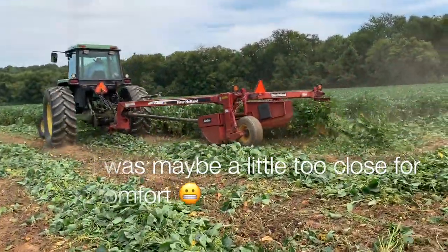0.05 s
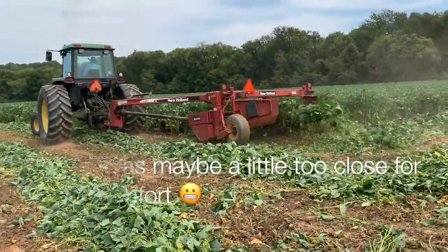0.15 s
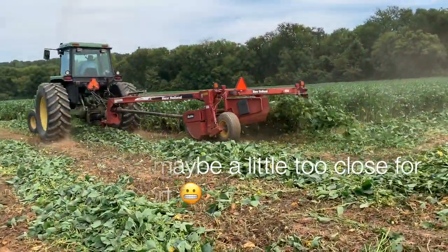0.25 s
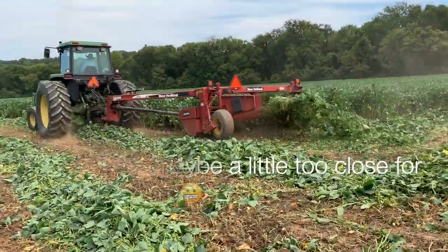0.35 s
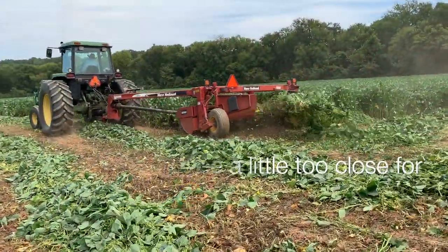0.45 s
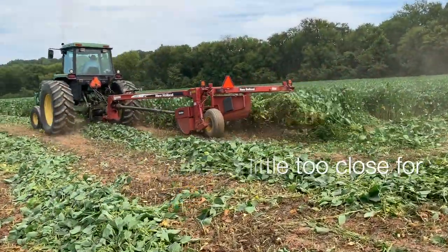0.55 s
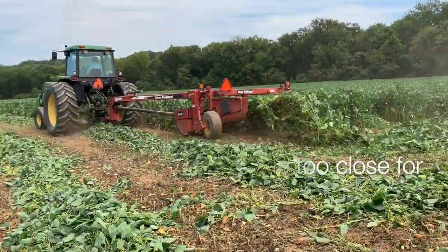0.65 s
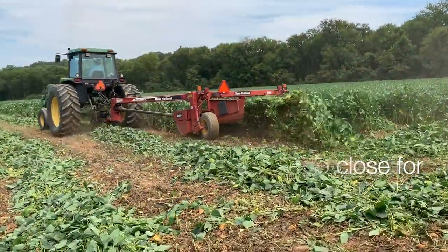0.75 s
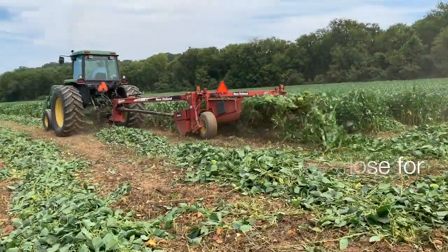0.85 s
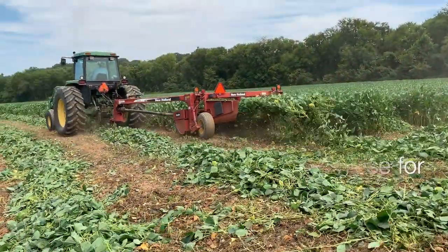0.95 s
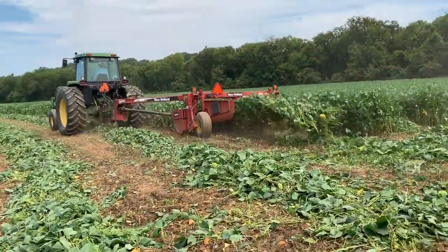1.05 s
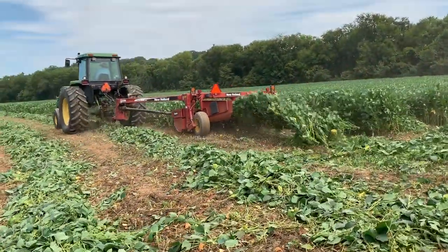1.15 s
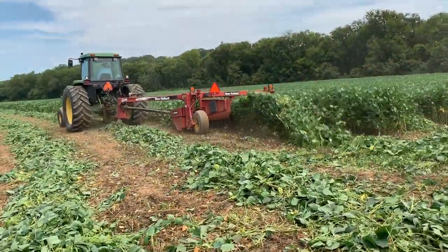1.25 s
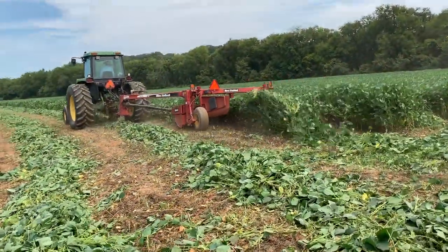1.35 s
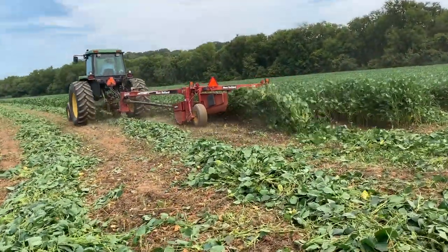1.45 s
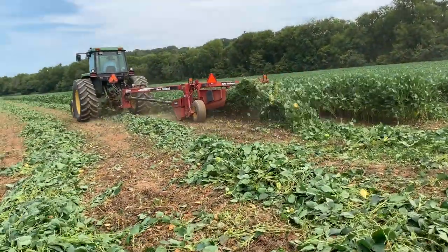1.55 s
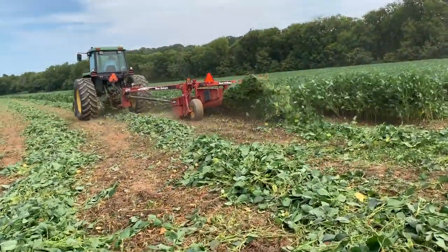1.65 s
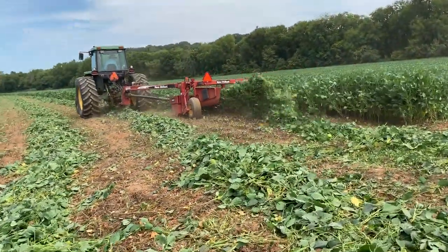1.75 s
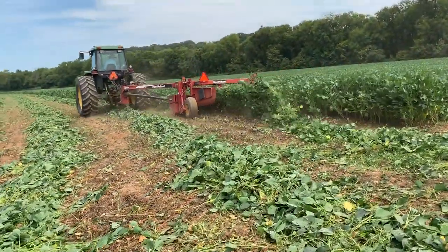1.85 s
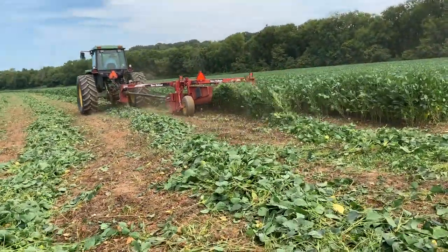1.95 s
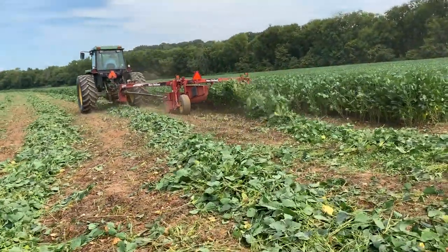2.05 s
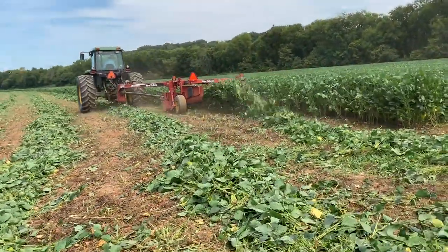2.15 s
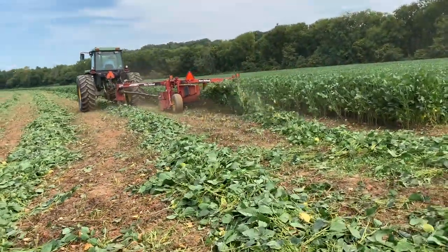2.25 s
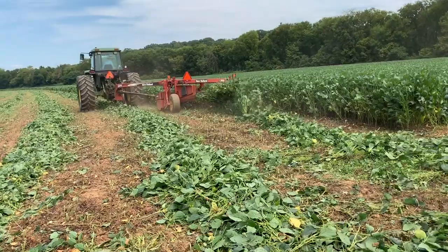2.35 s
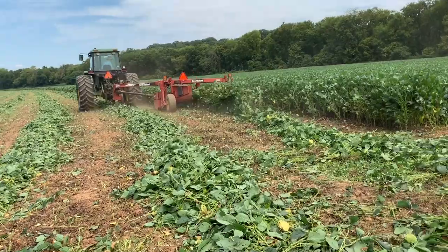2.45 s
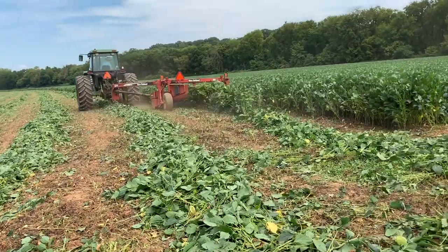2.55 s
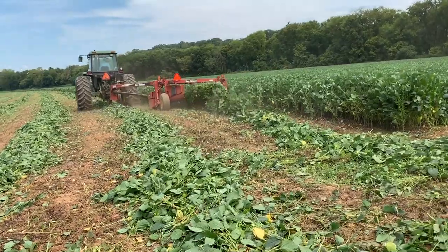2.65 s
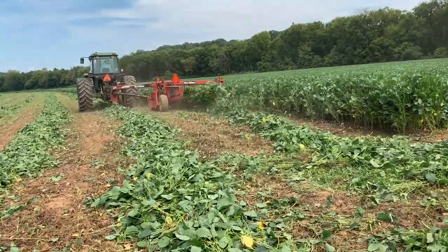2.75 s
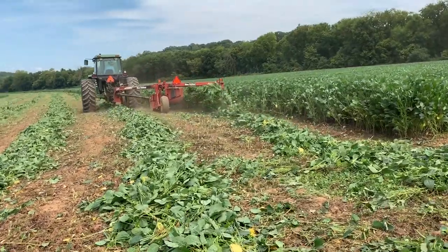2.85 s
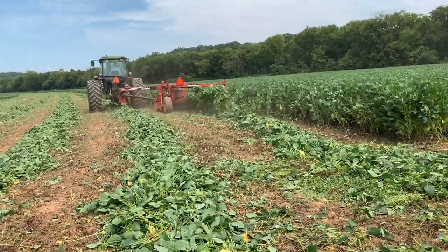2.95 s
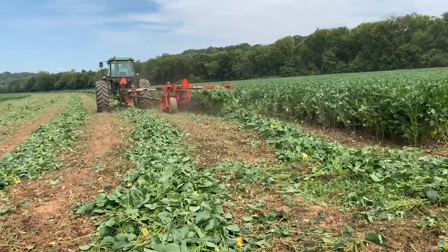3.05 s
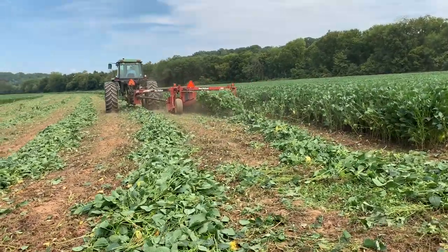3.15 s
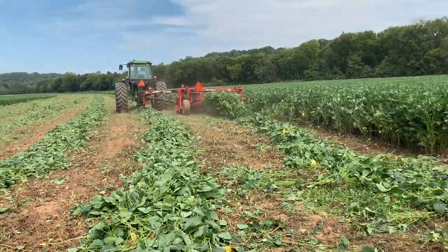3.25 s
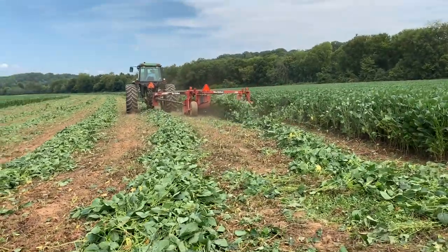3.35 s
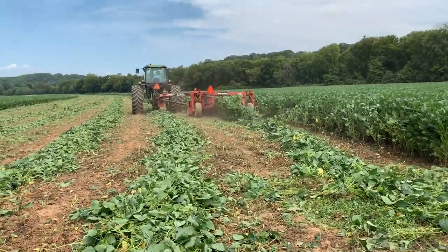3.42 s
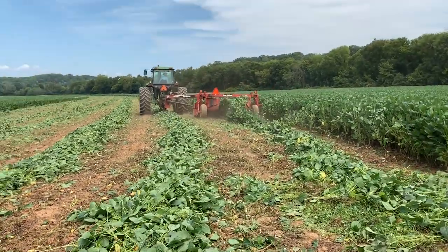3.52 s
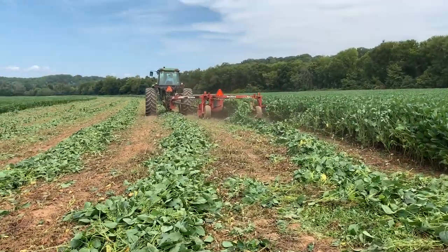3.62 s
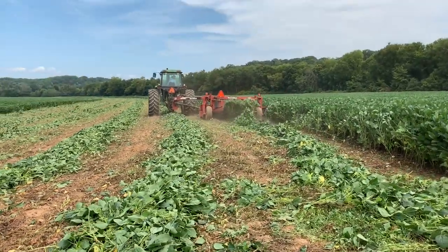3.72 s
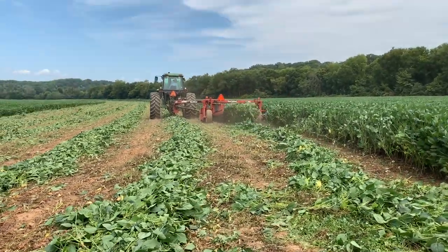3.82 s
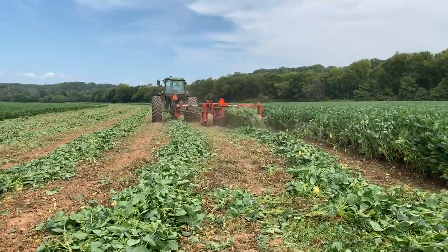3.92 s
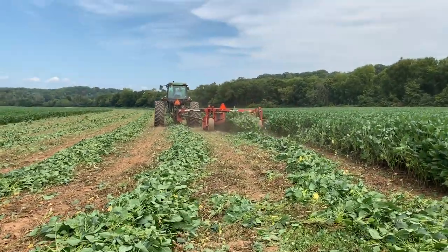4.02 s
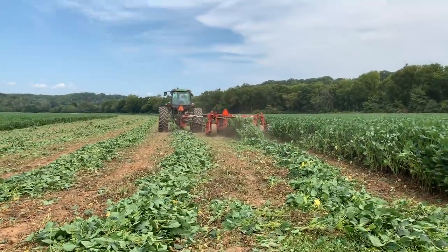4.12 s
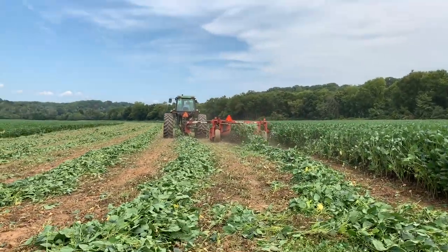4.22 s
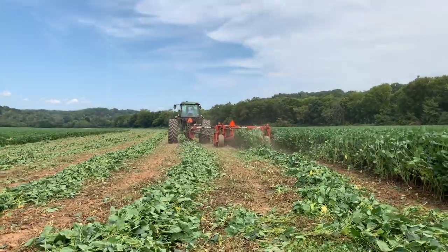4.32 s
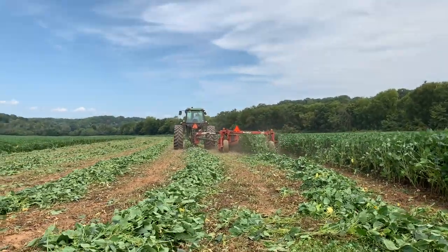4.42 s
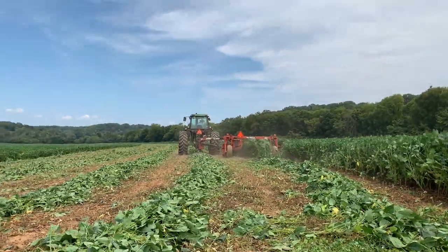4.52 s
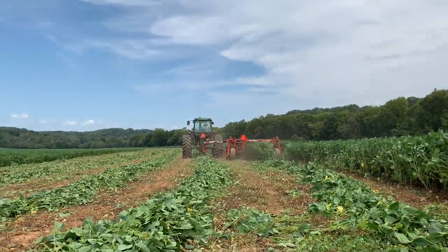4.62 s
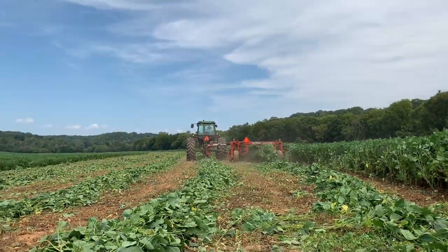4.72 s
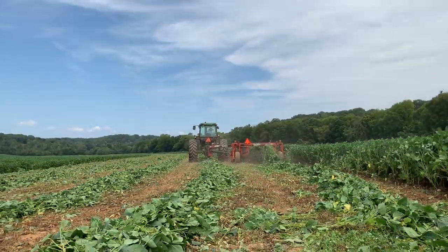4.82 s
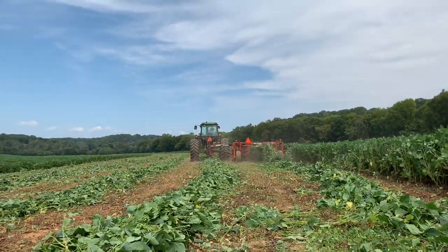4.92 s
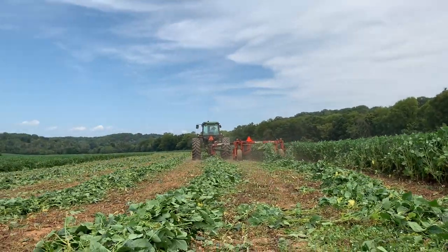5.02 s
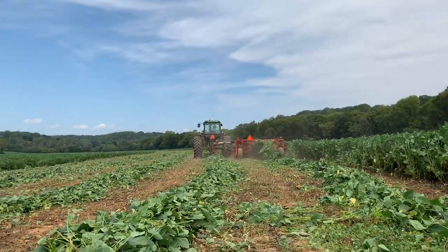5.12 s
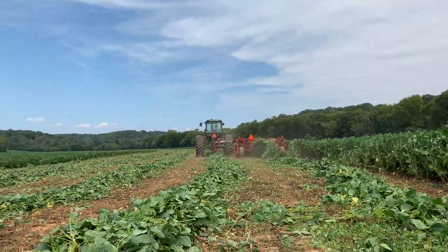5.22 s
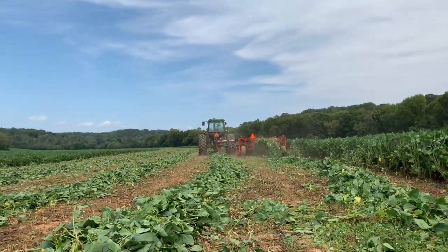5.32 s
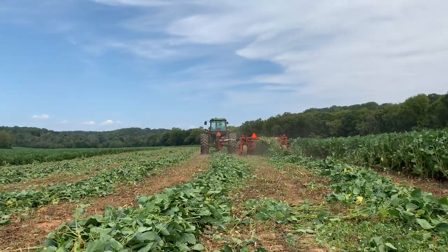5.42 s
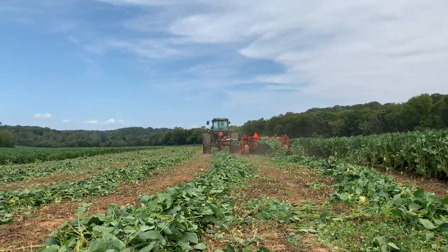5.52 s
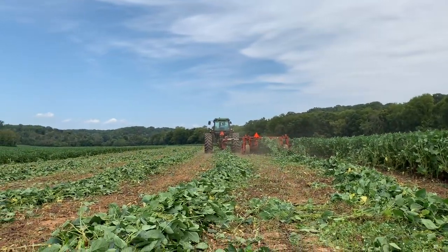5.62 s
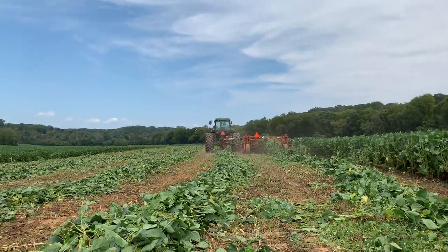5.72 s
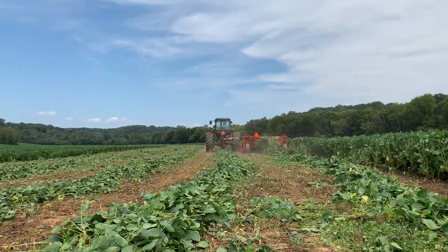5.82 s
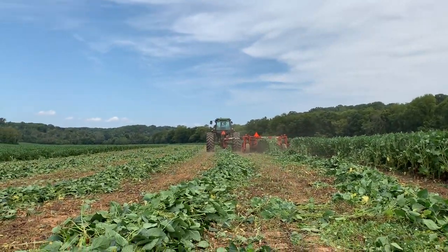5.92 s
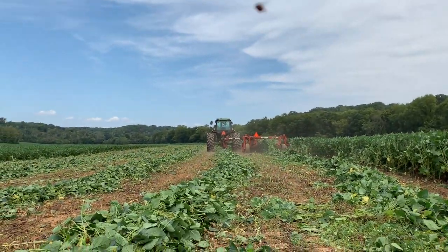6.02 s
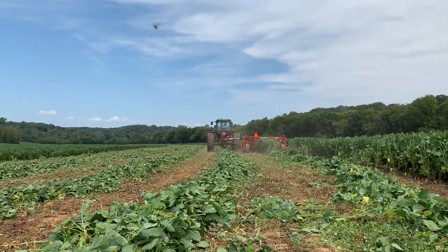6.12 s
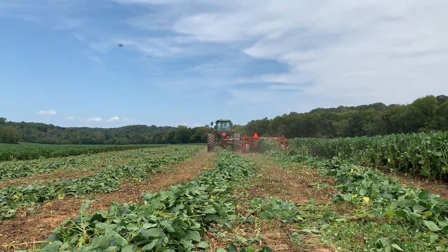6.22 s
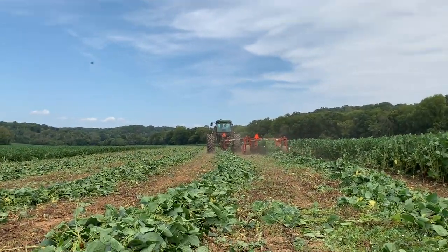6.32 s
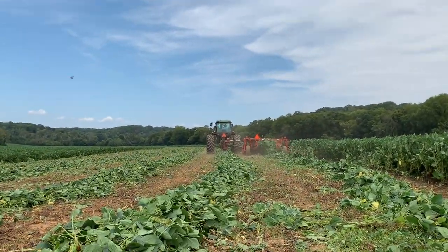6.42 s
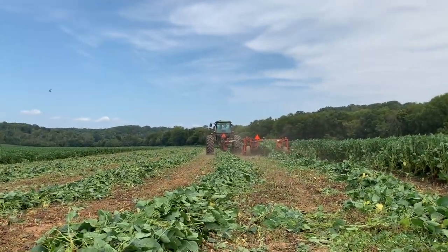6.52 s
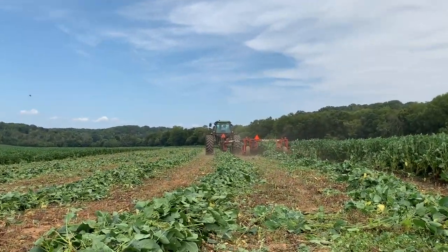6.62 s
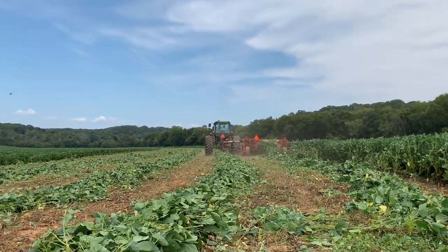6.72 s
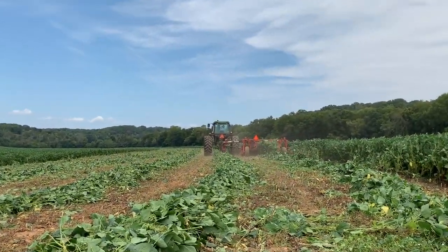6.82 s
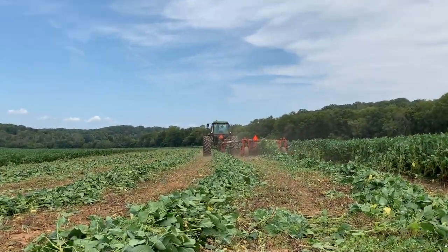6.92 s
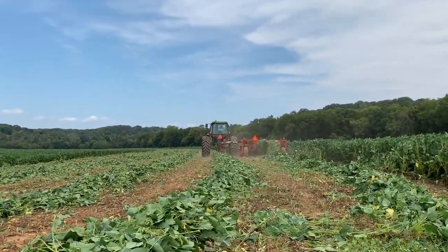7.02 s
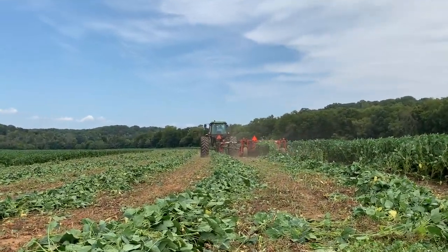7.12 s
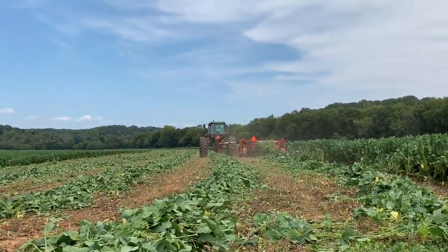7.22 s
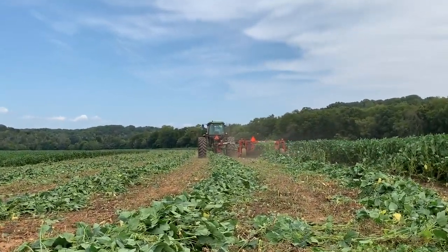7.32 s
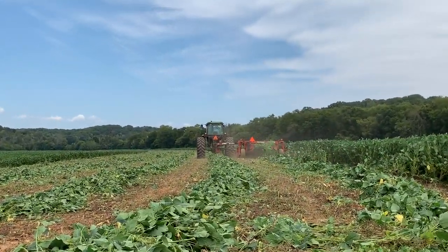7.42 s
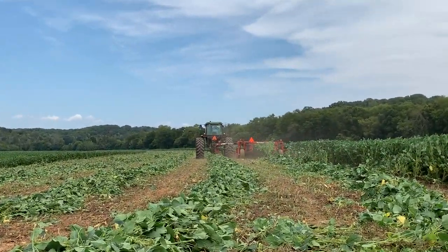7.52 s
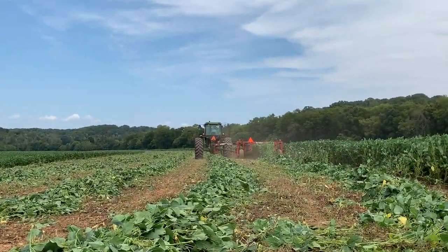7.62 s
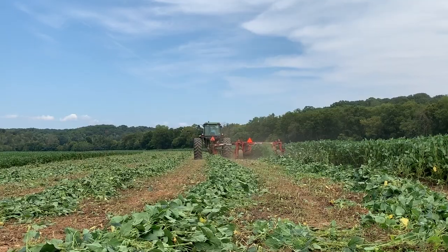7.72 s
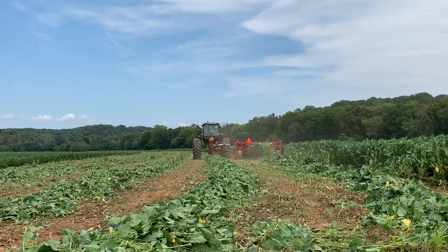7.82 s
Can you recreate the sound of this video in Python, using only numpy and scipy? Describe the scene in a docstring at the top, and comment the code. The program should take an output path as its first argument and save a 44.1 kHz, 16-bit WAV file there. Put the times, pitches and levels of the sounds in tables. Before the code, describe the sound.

Open field, handheld stereo phone, light wind. At 0 s a diesel tractor and disc mower are only metres away: a low engine note near 100 Hz beats quickly against the knife hum, under a booming, rattling metal roar. A thin, piercing steel squeal around 4.3 kHz wavers until about 1.5 s, while cut stalks rasp and leaves spray with bright hiss. The engine rises slightly to steady speed by 2 s. From 2 to 4 s the machine recedes, boom fading, a whirring whine and short scrapes showing through; stalks snap near 1.9, 3.9 and 4.0 s. A clump of crop swishes around 4.5 s. Wind bumps thud from 4.7 to 5.6 s, with one dull knock at 5.5 s. After 5 s only a thin, throbbing drone and dry rasp remain. Dry leaves crunch at 6.7 s, and faint squealing returns from 6.5 s to the end at 7.9 s.

```python
"""A six-cylinder tractor pulls a disc mower away from a phone held in a bean field, gaining speed at first.
The exhaust note is a harmonic series on the firing rate; the knife hum, about 9 Hz lower, beats with it.
Filtered noise, pulsed by knives and engine, gives the booming, roaring hood and the hiss of cut stalks.
Dry steel squeals as a rubbed resonance. Distance and ground reflection thin the machine to a steady drone,
while light wind rumbles and bumps on the microphone."""
import sys
import numpy as np
from scipy import signal
from scipy.fft import rfft, irfft, next_fast_len
from scipy.io import wavfile
from scipy.ndimage import uniform_filter1d, map_coordinates

SR = 44100
rng = np.random.default_rng(int(sys.argv[2]) if len(sys.argv) > 2 else 0)


def file_out(sig):
    """Save sig as 16-bit WAV at sys.argv[1]."""
    # one column per channel
    cols = np.atleast_2d(sig).T
    # limit, then scale
    lim = np.clip(cols, -1, 1)
    pcm = np.round(lim * 32767).astype(np.int16)
    wavfile.write(sys.argv[1], SR, pcm)


N = 347067
T = np.arange(N) / SR

# the engine pulls up to its governed speed: time_s, firing_rate_hz
ENGINE_SPEED = [(0, 99.4), (1.2, 107.3), (2.2, 109.9), (3.3, 109.2), (4.4, 109.6), (5, 108.7), (6.3, 109.3),
                (7.87, 108.3)]
# ground reflection shifts the colour with distance: time_s, far_share (0 to 1), near_pitch_factor (ratio)
GROUND_COLOUR = [(0, 0.07, 1.01), (1.5, 0.029, 0.99), (2.7, 0.17, 0.97), (3.6, 0.11, 1.057),
                 (4.2, 0.24, 1.007), (4.7, 0.46, .95), (5.2, 0.74, 0.85), (7.87, 1, 0.83)]
# how each sound carries: start_level_db, loss_per_doubling_of_distance_db, loss_far_down_the_row_db,
# gain_at_lowest_engine_speed_db
CARRYING = {"exhaust": (-23, 1, 3, 3), "boom": (-15.5, 12.5, 7, -7.5), "roar": (-21.5, 4, 9, -1.5),
            "gears": (-24, 7.5, 5.5, 2), "rasp": (-26.5, 4.5, 8, -4.5), "chaff": (-29, 11, 4, -5)}


def engine(firings):
    """Periodic firing gives a line at the firing rate; unequal cylinders add weaker related lines."""
    # weaker exhaust lines: multiple_of_firing_rate (ratio), level_against_exhaust_note_db
    exhaust_orders = [(1 / 2, -22), (3 / 2, -18.5), (2, -9.5), (3, -28.5)]
    note = line(firings, flutter_db=2.0, wobble=0.03)
    for order, db in exhaust_orders:
        note = note + undb(db) * line(order * firings, flutter_db=5.5, wobble=0.28)
    return note * undb(carried(*CARRYING["exhaust"]))


def knives(passes):
    """Blade-passing tone: each knife drags a pulse of air past the hood, and its harmonics carry unequally."""
    # harmonics 1 to 4: start_level_db, loss_per_doubling_db, loss_far_db, gain_at_lowest_speed_db
    hum_carrying = [(-19.5, 9.6, 1.3, -9.5), (-19, 5.35, 0.34, -7.5), (-22, 15.8, 8.1, -10),
                    (-31, 7.8, 7.5, 0)]
    # the ground reflection cancels a harmonic in passing: harmonic_number, centre_s, depth_db, length_s
    reflection_nulls = [(1, 0.86, 9.5, 0.096), (2, 2.69, 12, 0.29), (2, 3.6, 7.5, 0.19), (2, 5.6, 7, .04),
                        (2, 5.3, 4, 0.046), (2, 7.55, 7, 0.088), (4, 2.35, 19, 0.43)]
    # weaker mower lines: multiple_of_knife_rate (ratio), level_against_third_harmonic_db
    knife_orders = [(5 / 2, -19), (5, -14.5), (6, -13)]
    levels_db = [carried(*row) for row in hum_carrying]
    for harmonic, centre_s, depth_db, length_s in reflection_nulls:
        levels_db[harmonic - 1] -= depth_db * bell(centre_s, length_s)
    first, second, third, fourth = undb(levels_db)
    hum = first * line(passes, flutter_db=0.5, wobble=0.057)
    hum = hum + second * line(2 * passes, flutter_db=2.0, wobble=0.05)
    hum = hum + fourth * line(4 * passes, flutter_db=2.5, wobble=0.11)
    upper = line(3 * passes, flutter_db=3, wobble=0.32)
    for order, db in knife_orders:
        upper = upper + undb(db) * line(order * passes, flutter_db=2.5, wobble=0.15)
    return hum + third * upper


def hood_boom(passes):
    """Cavity resonance: air churned by the knives booms under the hood."""
    # colour of the boom: frequency_hz, level_db
    boom_colour = [(60, -27), (120, -12), (170, -3.5), (215, 2.5), (260, 0.5), (310, -4), (380, -11),
                   (450, -27), (700, -39)]
    churn = ports(side_db=-24.0) * strokes(passes, depth=0.29)
    return colour(churn, boom_colour) * undb(carried(*CARRYING["boom"]) + 1.43 * walk(11))


def drumming_steel():
    """Panel resonance: the hood's sheet steel drums, heard only from close behind."""
    # one swell of drumming: centre_s, level_db, length_s
    drumming = (0.66, -29, 0.59)
    panel = [(220, -15), (320, -2.0), (400, -5), (500, -12.5), (620, -3.0), (800, -13)]
    return colour(ports(side_db=-30), panel) * swell(*drumming)


def rattle(turns):
    """Random impacts: loose guards and linkage tick most often at one point of each turn of the discs."""
    # colour of the ticks: frequency_hz, level_db
    rattle_colour = [(480, -24), (700, 6), (1000, -3), (1200, -11), (1500, 2), (1800, -8.5), (2250, -4.5),
                     (2900, -20)]
    chance = 240 / SR * strokes(turns, depth=.8)  # 240 ticks per s, rms over a turn
    ticks = (rng.random(N) < chance) * np.sign(noise())
    ticks = ticks * undb(1.5 * walk(40))
    return colour(ticks, rattle_colour) * undb(-10)  # against the near roar


def hood_roar(passes, firings):
    """Modulated turbulence: knife wakes and disc clatter make the hood roar, coloured by distance."""
    # roar from close behind: frequency_hz, level_db
    near_colour = [(330, -20), (440, -8.5), (520, -12.5), (640, 0.5), (800, 3.5), (1040, 1), (1190, -15.5),
                   (1300, -2), (1430, 2), (1570, -4), (1700, -13), (1850, -14.5), (2150, -10),
                   (2800, -22.5), (4000, -12.5), (6000, -67)]
    # roar from far down the row: frequency_hz, level_db
    far_colour = [(330, 0), (430, -0.5), (520, -7), (600, -2), (680, -0.5), (780, 2.5), (910, -8),
                  (1050, -1.5), (1220, 0.5), (1450, -11.5), (1640, -4.5), (1790, -3.5), (1970, -16.5),
                  (2130, -7), (2900, -23.5), (4000, -14.5), (6000, -31)]
    far = far_share()
    shift = curves(GROUND_COLOUR)[1]
    turns = passes / 2  # two knives on each disc

    drive = ports(side_db=-12.5) + 0.22 * clatter(turns, wobble=0.0043)
    drive = drive * strokes(turns, depth=0.052)
    # uneven ground makes the near colour wander: reading at a varying speed moves its pitch
    place = np.cumsum(shift * (1 + .014 * walk(5))) % N
    near = np.array([np.interp(place, np.arange(N), port) for port in colour(drive, near_colour)])

    # further off, the knock of the engine stands out more
    distant = ports(side_db=-44.0) + 0.27 * clatter(turns, wobble=0.0025)
    distant = colour(distant * strokes(firings, depth=0.11), far_colour)

    roar = np.sqrt(1 - far) * (near + rattle(turns)) + np.sqrt(far) * distant
    roar = restless(roar, depth_db=0.88, rate=9)
    roar = roar * undb(carried(*CARRYING["roar"]) + 0.36 * walk(12))
    return roar * undb([[0.35], [0]])  # a little louder on the left


def roar_swells():
    """Narrow-band resonance: bands of the roar swell in passing."""
    # centre_s, frequency_hz, level_db, length_s, width_hz
    swelling_bands = [(1.28, 268, -23.5, 0.29, 80.4), (2.402, 1418, -34, 0.41, 150.5),
                      (3.67, 2000, -34.5, 0.35, 403.5), (3.7, 1077, -36, 0.25, 139.2),
                      (3.856, 310, -35, 0.35, 50.2), (4.03, 1445, -32.5, .13, 69.6),
                      (4.52, 1290, -37.5, 0.39, 150), (4.38, 1530, -41, .14, 110)]
    return sum(swell(s, db, length) * rasping_tone(hz * T, width)
               for s, hz, db, length, width in swelling_bands)


def gears(passes):
    """Gear meshing: the cutter bar whines and whirrs at fixed multiples of the knife rate."""
    # whines: multiple_of_knife_rate (ratio), level_against_gear_level_db
    whines = [(9, -31), (10.5, -15), (11.5, -24), (14, -30)]
    # level of the whirr: time_s, level_db
    whirr_level = [(0, -52), (1.5, -42), (2.4, -41), (3.7, -41.5), (4.7, -42.5), (5.5, -46.5), (6.5, -49.5),
                   (7.87, -50)]
    whine = sum(undb(db) * line(order * passes, flutter_db=3.0, wobble=0.95) for order, db in whines)
    teeth = 18 * passes  # the whirr lies at 18 times the knife rate
    whirr = line(teeth, flutter_db=0.5, wobble=0.52) + rasping_tone(teeth, width_hz=90)
    whirr = unit(whirr) * undb(curves(whirr_level)[0])
    return whirr + whine * undb(carried(*CARRYING["gears"]))


def squeals(firings):
    """Stick-slip friction: a dry bearing sings, with scrapes and hissing bands, in bursts locked to the shaft."""
    # the bearing squeals without a break at first and comes back faintly from afar: time_s, level_db
    squeal_level = [(0, -39), (.09, -32), (.16, -35.5), (.21, -32.5), (.38, -31.5), (.57, -27.8), (.7, -30),
                    (.76, -35.5), (.84, -30), (.98, -28.7), (1.04, -30), (1.13, -30), (1.2, -36),
                    (1.28, -33), (1.46, -39), (1.8, -53), (2.2, -120), (6.3, -70), (6.55, -46.5),
                    (6.8, -48), (6.98, -45), (7.1, -48.5), (7.38, -48.5), (7.5, -43), (7.67, -41.5),
                    (7.76, -47), (7.87, -49)]
    # pitch of the squeal: time_s, frequency_hz
    squeal_pitch = [(0, 4306), (1.13, 4309), (1.5, 4235), (6.5, 4160), (7.2, 4175), (7.6, 4230),
                    (7.87, 4200)]
    # scrapes and short swells of rough, hissing bands: centre_s, frequency_hz, level_db, length_s, width_hz
    rough_bands = [(1.66, 4100, -29, .007, 600), (1.755, 4100, -36, 0.022, 400), (1.9, 4250, -40, .03, 400),
                   (3.55, 3400, -42, .3, 450), (3.85, 6600, -41, 0.49, 1000),
                   (3.995, 3680, -36, 0.022, 220), (4.15, 4110, -43, 0.16, 252),
                   (4.4, 3770, -32.5, 0.085, 220), (4.55, 4200, -38, 0.17, 380),
                   (4.77, 3900, -38.5, 0.13, 340), (5.25, 3700, -45, 0.16, 400),
                   (5.35, 5460, -49, 0.26, 440), (5.965, 4170, -39, 0.024, 300),
                   (6.856, 4190, -38.5, .005, 400)]
    upper_mode_hz, upper_mode_db = 100, -5  # a rougher mode this far above the first, and its level
    turns = np.cumsum(curves(squeal_pitch)[0]) / SR
    far = far_share()
    # flicker of the distant squeal and the rough bands
    chatter = unit(undb(1.3 * walk(70)))
    # close by, a steady line with a share of rubbing noise
    singing = line(turns, flutter_db=2.7, wobble=0.78) + .65 * rasping_tone(turns, width_hz=170)
    singing = unit(singing)
    grating = chatter * rasping_tone(turns, width_hz=270)
    upper = undb(upper_mode_db) * rasping_tone(turns + upper_mode_hz * T, width_hz=260)
    squeal = np.sqrt(1 - far) * singing + np.sqrt(far) * grating + upper
    squeal = squeal * undb(curves(squeal_level)[0])
    rough = sum(swell(s, db, length) * rasping_tone(hz * T, width)
                for s, hz, db, length, width in rough_bands)
    bursts = unit(strokes(firings / 2, depth=0.088) * strokes(firings, depth=0.1))
    return (squeal + chatter * rough) * bursts * undb([[-1.5], [.8]])  # left, right port in dB


def crop(firings):
    """Many small fractures sum to noise: stalks rasp, chaff flies and leaves spray out in uneven clumps."""
    # colours of the rasp from close, midway and far: frequency_hz, level_db
    rasp_near = [(1800, 3), (2200, -0.5), (2500, -1), (3050, -6), (3400, -2.5), (3800, -4), (4200, -1),
                 (4600, -11), (5500, -34)]
    rasp_midway = [(1800, -5), (2200, -1.5), (2600, -2.5), (2950, -4), (3250, -9), (3550, 1.5),
                   (3900, -3.5), (4250, 1), (4600, -16), (5500, -35)]
    rasp_far = [(1800, -48), (2500, 0.5), (2850, -6.5), (3150, 2), (3400, 0), (3800, 2), (4200, -2),
                (4550, -3.5), (5500, -31)]
    # when the rasp has its midway colour: centre_s, length_s
    midway_time = (4.7, 0.7)
    # colours of the chaff and the sprayed leaves: frequency_hz, level_db
    chaff_colour = [(3800, -9), (4700, 1.5), (5300, 1.5), (5900, 0.5), (6600, -0.5), (7300, -5), (8500, -4)]
    spray_colour = [(5800, -12), (7000, -1.5), (8000, 3), (11500, -1), (15500, -1), (16400, -23)]
    # fine hiss of the sprayed leaves: time_s, level_db
    spray_level = [(0, -32), (.5, -28.5), (1.5, -28), (2.6, -32.5), (4.2, -34), (5.2, -37.5), (5.9, -38),
                   (7.1, -45), (7.87, -46.5)]
    # thick clumps of stalks go through the knives: centre_s, extra_rasp_db, length_s
    clumps = [(0.54, 3, 0.13), (1.69, 2, 0.047), (2.787, 5, 0.013), (3.35, 1.7, 0.09), (3.62, 2.5, .04),
              (4.492, 4.5, 0.53), (6.683, 2, .025), (7.47, 0.5, 0.026)]
    # rasp and chaff reach the left port first: time_s, lead_samples
    left_lead = [(0, 3.7), (1.5, 3.4), (2.5, 5.4), (4, 2.7), (5, 0.41), (7.87, 1.7)]
    far = far_share()
    feed = walk(18)
    clumps_db = sum(db * bell(s, length) for s, db, length in clumps)

    drive = ports(side_db=-5.0, grain_db=1.5) * strokes(firings / 2, depth=0.059)
    rasp = np.sqrt(1 - far) * colour(drive, rasp_near) + np.sqrt(far) * colour(drive, rasp_far)
    midway = bell(*midway_time)
    middle = colour(ports(side_db=-12.0, grain_db=0.5), rasp_midway) * strokes(firings / 2, depth=0.095)
    rasp = np.sqrt(1 - midway) * rasp + np.sqrt(midway) * middle
    rasp = restless(rasp, depth_db=2.0, rate=10)
    rasp = rasp * undb(carried(*CARRYING["rasp"]) + clumps_db + 0.58 * feed)

    chaff = restless(colour(ports(side_db=-0.5, grain_db=2.0), chaff_colour), depth_db=2.5, rate=8)
    chaff = chaff * undb(carried(*CARRYING["chaff"]) + 0.79 * clumps_db + 0.36 * feed)

    spray = restless(colour(ports(side_db=-58.5, grain_db=1.9), spray_colour), depth_db=2.5, rate=12)
    spray = spray * undb(curves(spray_level)[0] + 0.51 * feed)
    lead, = curves(left_lead)
    # the finest hiss reaches the right port a constant 11.4 samples before the left
    return across_ports(rasp + chaff, lead) + across_ports(spray, -11.4)


def stalks():
    """Brittle fracture, a sharp burst of noise: single stalks snap and dry leaves crunch close by."""
    # stalks snap: start_s, level_db, decay_s
    snaps = [(1.936, -27, .005), (3.876, -32, 0.0057), (4.02, -29, 0.0092)]
    # dry leaves crunch: start_s, level_db, decay_s
    rustles = [(6.66, -28.5, .007), (6.674, -32, .006), (6.686, -35.5, .006)]
    snap = colour(ports(side_db=-4), [(2500, -14), (5000, -7), (7500, 7), (11000, -2), (15500, -5)])
    leaf_colour = [(700, -15), (1500, 3), (3500, 3), (5200, 5), (6500, -17), (12000, -11)]
    leaves = colour(ports(side_db=-10, grain_db=-4.0), leaf_colour)
    return snap * cracks(snaps) + leaves * cracks(rustles)


def knock():
    """A damped low resonance: one light, dull knock, the same at both ports."""
    # start_s, level_db, decay_s
    knock_events = [(5.486, -23, .008)]
    hollow = [(200, -15), (300, -6), (380, 0), (470, -7), (650, -28)]
    return colour(noise(), hollow) * cracks(knock_events)


def wind():
    """Turbulent pressure on the microphone: a low rumble, with short thumps and eddies at each gust."""
    # colour of the rumble: frequency_hz, level_db
    wind_colour = [(12, -19), (25, -12), (38, -6), (55, -2.5), (80, -4.5), (130, -5), (200, -11.5),
                   (400, -33)]
    # the breeze comes and goes, weaker toward the end: time_s, level_db
    breeze = [(0, -22.5), (.35, -22), (2.4, -28.5), (3.5, -25), (4.3, -28), (5.1, -23.5), (5.9, -28.5),
              (6.6, -31), (7.87, -29.5)]
    # gusts thump the microphone: centre_s, frequency_hz, level_db, length_s
    bumps = [(4.72, 102, -20, .018), (5.075, 72, -22.5, .011), (5.198, 62, -18.5, .011),
             (5.53, 95, -26, .012), (5.608, 68, -17.5, .01), (7.565, 66, -24, .02)]
    rumble = colour(ports(side_db=-10.5), wind_colour) * undb(curves(breeze)[0] + 2.2 * walk(5.04))
    eddy_colour = [(20, -10), (50, -21.0), (110, -1), (200, -9), (320, -13), (450, -21), (900, -52)]
    eddies = colour(ports(side_db=-15), eddy_colour)
    thumps = 0
    for s, hz, db, length in bumps:
        tone = np.sqrt(2) * np.sin(2 * np.pi * (hz * T + rng.random()))
        thumps = thumps + swell(s, db, length) * (tone + .5 * eddies)
    return rumble + thumps


def far_share():
    """Ground reflection: the share of the far colour over time, 0 to 1."""
    return np.clip(curves(GROUND_COLOUR)[0], 0, 1)


def carried(db, doubling_db, far_db, slow_db):
    """Spreading loss: level in dB at the phone, from engine speed, distance and place down the row."""
    start_m, drive_m_s = 8.35, 1.764  # the machine drives straight away from the phone
    hz, = curves(ENGINE_SPEED)
    slow = (hz.max() - hz) / np.ptp(hz)
    doublings = np.log2(1 + drive_m_s * T / start_m)
    return db + slow_db * slow - doubling_db * doublings - far_db * far_share()


def across_ports(x, lead):
    """Time difference between ports: the sound reaches the left port lead samples before the right."""
    return np.array([x[0], map_coordinates(x[1], [np.arange(N) - lead], order=5)])


def line(turns, flutter_db, wobble):
    """Amplitude and phase modulation: a tone of rms 1 flutters in level (dB) and timing (radians)."""
    return unit(undb(flutter_db * walk(25)) * np.sin(2 * np.pi * turns + wobble * walk(30)))


def rasping_tone(turns, width_hz):
    """Random modulation in quadrature: a resonance kept ringing by random excitation."""
    in_phase = walk(width_hz) * np.cos(2 * np.pi * turns)
    return in_phase + walk(width_hz) * np.sin(2 * np.pi * turns)


def strokes(turns, depth):
    """Periodic modulation: a swell once in every cycle; rms 1."""
    return unit(np.exp(depth * np.cos(2 * np.pi * turns)))


def clatter(turns, wobble, size=400):
    """Shaft periodicity: a rough pattern comes round again on every turn."""
    place = (turns + wobble * walk(20)) * size
    return unit(map_coordinates(rng.standard_normal(size), [place % size], order=1, mode="grid-wrap"))


def ports(side_db, grain_db=0):
    """Partial coherence: noise at two ports, shared and opposed; grain makes a shower of unequal ticks."""
    ticks = np.minimum(rng.exponential(size=N // 16 + 1), 4)
    ticks = np.repeat(ticks, 16)[:N]
    opposed = undb(side_db) * noise() * np.array([[1], [-1]])
    return (noise() + opposed) * undb(grain_db * ticks)


def restless(x, depth_db, rate, size=1024):
    """Short-time spectral modulation: narrow bands swell and sink on their own, about rate times a second."""
    spectra = signal.stft(x, nperseg=size)[2]
    drift = uniform_filter1d(rng.standard_normal(spectra.shape[1:]), size=4, axis=0)
    drift = unit(uniform_filter1d(drift, max(int(2 * SR / size / rate), 1), axis=1))
    return unit(signal.istft(spectra * undb(depth_db * drift), nperseg=size)[1][:, :N])


def colour(x, points):
    """Linear filtering: shape x by a spectrum of (Hz, dB) points; rms 1."""
    hz, db = np.transpose(points)
    size = next_fast_len(N, real=True)
    bins = np.maximum(np.arange(size // 2 + 1) * SR / size, 1)
    gain = undb(np.interp(np.log(bins), np.log(hz), db, left=-90, right=-90))
    return unit(irfft(rfft(x, size) * gain, size)[..., :N])


def cracks(table):
    """Impulsive envelope: a sharp rise over 1.1 ms and an exponential fall for each row."""
    return sum(undb(db) * np.clip((T - s) / 0.0011, 0, 1) * np.exp(-np.abs(T - s) / decay)
               for s, db, decay in table)


def swell(s, db, length):
    """Gaussian envelope: a bell that peaks at a given level."""
    return undb(db) * bell(s, length)


def bell(s, length):
    """Gaussian curve: a rise and fall, 1 at its top."""
    return np.exp(-.5 * ((T - s) / length) ** 2)


def walk(rate):
    """Smoothed random process: levels held 1 / rate s and slewed twice; rms 1."""
    hold = max(int(SR / rate), 1)
    held = np.repeat(rng.standard_normal(N // hold + 2), hold)
    return unit(uniform_filter1d(uniform_filter1d(held, hold), hold)[:N])


def noise():
    """White noise: equal power at all frequencies."""
    return rng.standard_normal(N)


def unit(x):
    """Power normalization: scale to rms 1."""
    return x / np.sqrt(np.mean(x ** 2))


def undb(db):
    """Logarithmic level: decibels to amplitude gain."""
    return 10 ** (np.asarray(db) / 20)


def curves(table):
    """Linear interpolation: the columns of a table, joined by straight lines in time."""
    s, *columns = np.transpose(table)
    return [np.interp(T, s, column) for column in columns]


def scene():
    """Superposition: engine, mower and flying crop, heard through a light wind."""
    hz, = curves(ENGINE_SPEED)
    # a firing and a knife pass coincide near 0.02 s: the first throb
    firings = np.cumsum(hz) / SR - hz[0] * .02
    passes = .9193 * firings  # the mower is geared to the engine
    hood = hood_boom(passes) + drumming_steel() + hood_roar(passes, firings) + roar_swells()
    mower = knives(passes) + hood + gears(passes) + squeals(firings)
    return engine(firings) + mower + crop(firings) + stalks() + knock() + wind()


def record(dry):
    """Band limiting: the phone cuts the top with a steep elliptic low-pass at 15950 Hz."""
    return signal.sosfilt(signal.ellip(10, .2, 80, 15950, fs=SR, output="sos"), dry)


dry = scene()
out = record(dry)
file_out(out)
```